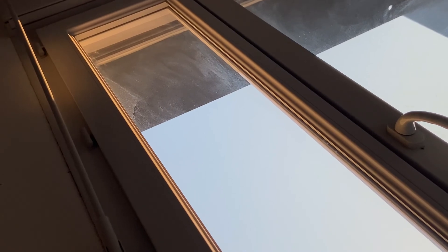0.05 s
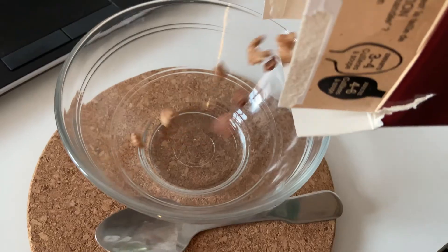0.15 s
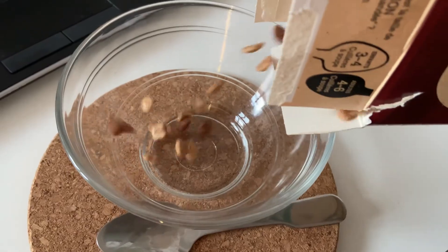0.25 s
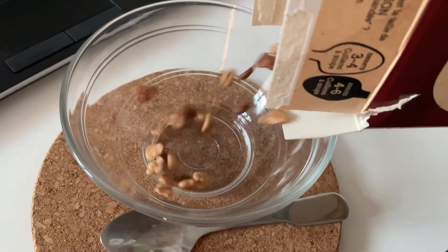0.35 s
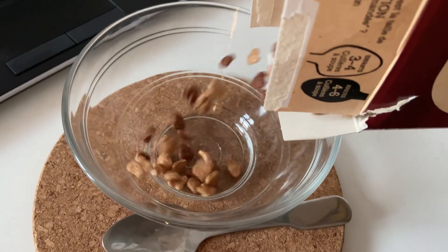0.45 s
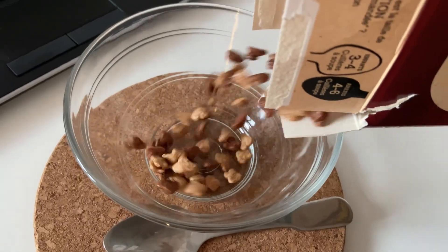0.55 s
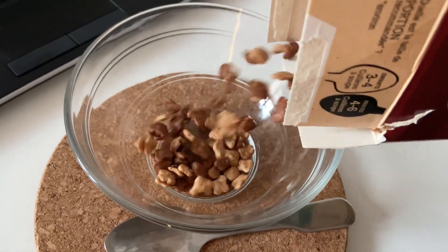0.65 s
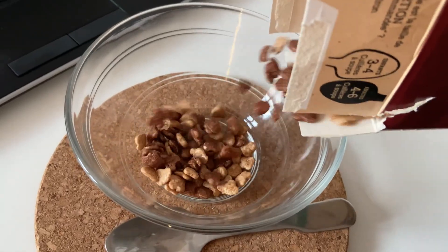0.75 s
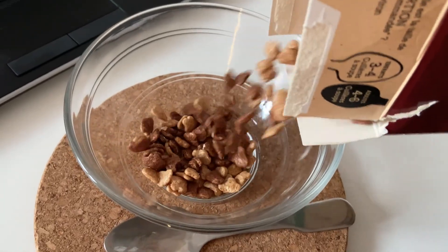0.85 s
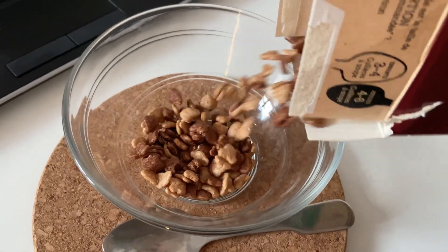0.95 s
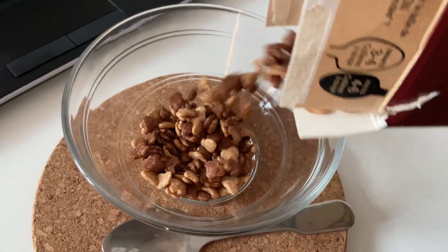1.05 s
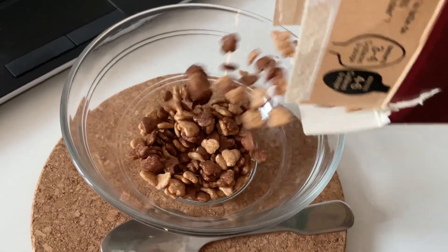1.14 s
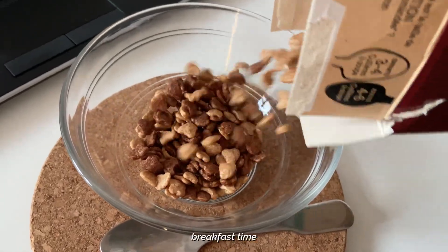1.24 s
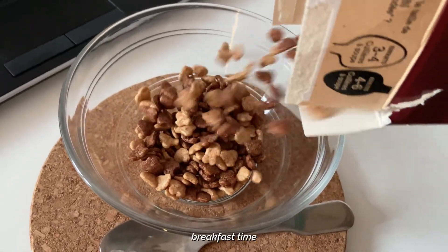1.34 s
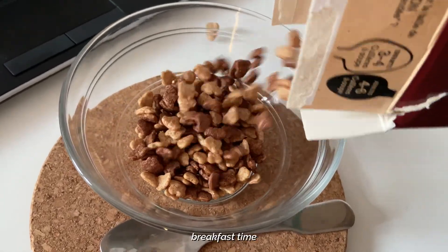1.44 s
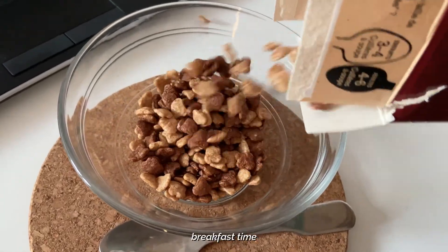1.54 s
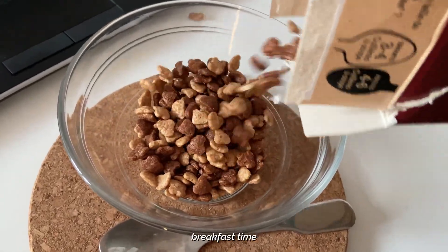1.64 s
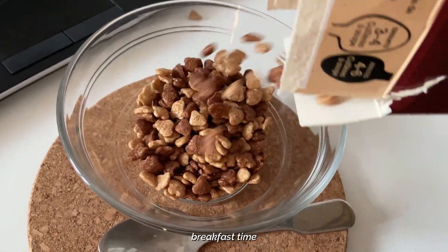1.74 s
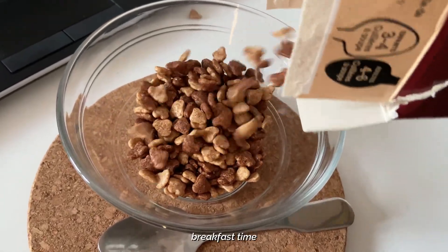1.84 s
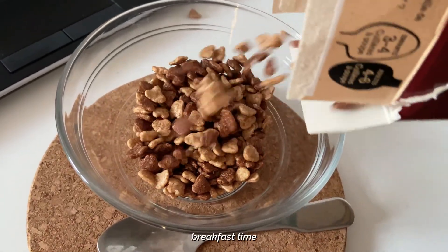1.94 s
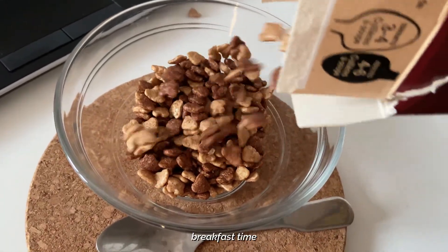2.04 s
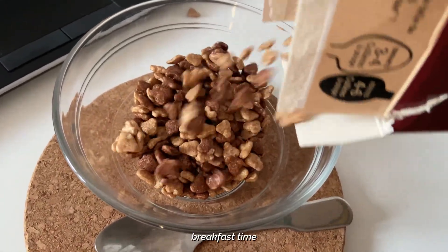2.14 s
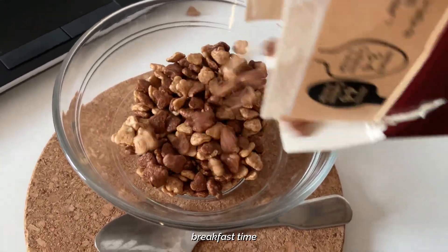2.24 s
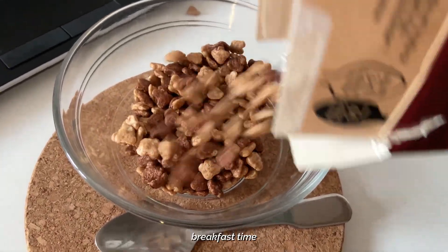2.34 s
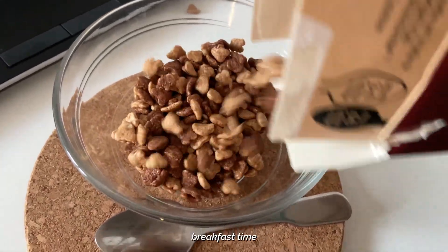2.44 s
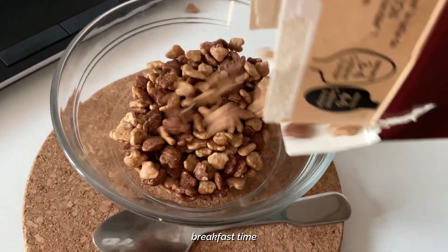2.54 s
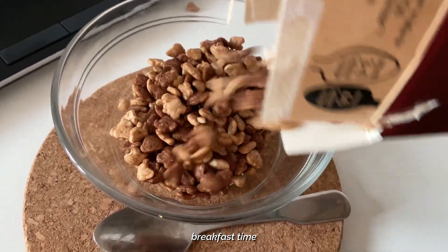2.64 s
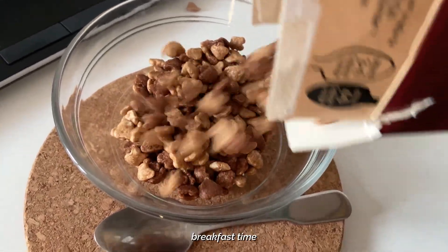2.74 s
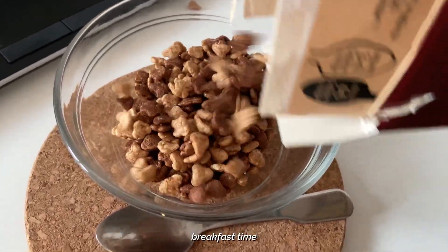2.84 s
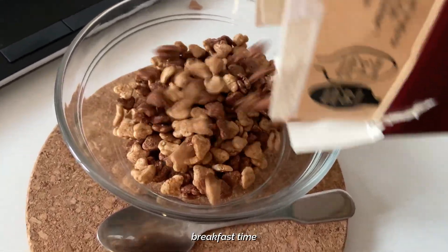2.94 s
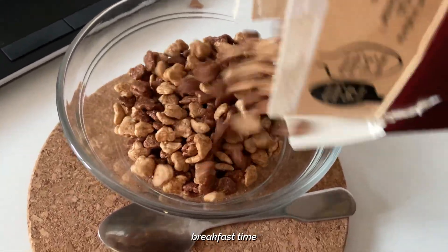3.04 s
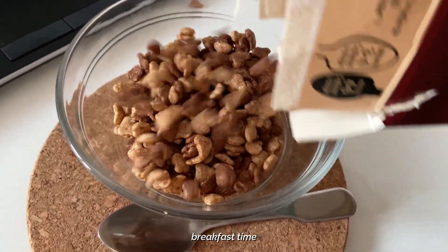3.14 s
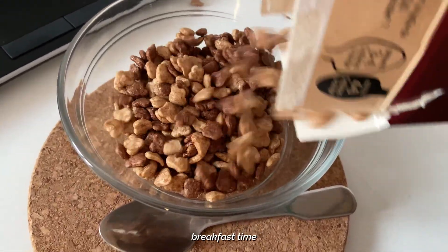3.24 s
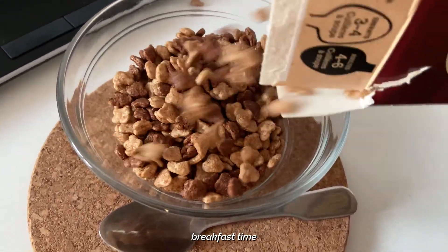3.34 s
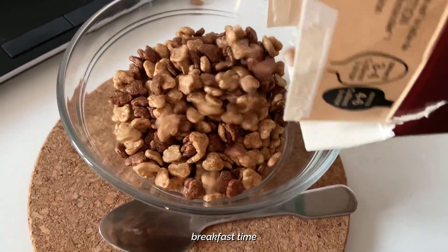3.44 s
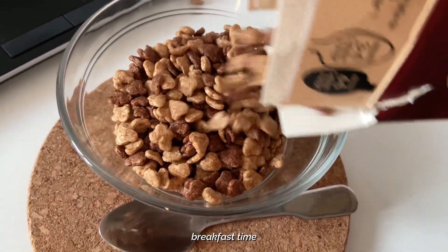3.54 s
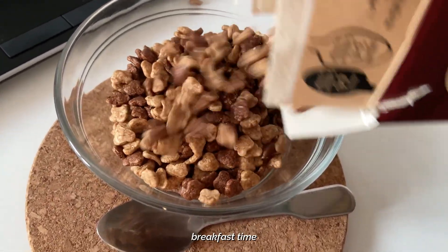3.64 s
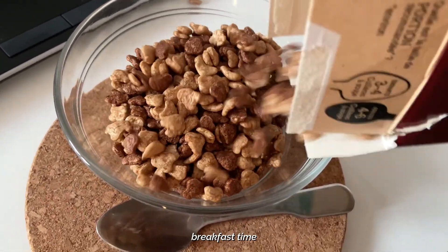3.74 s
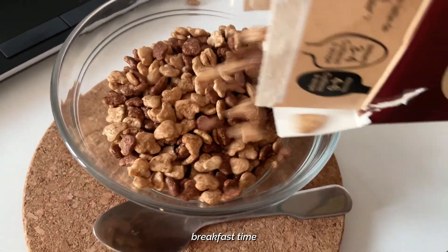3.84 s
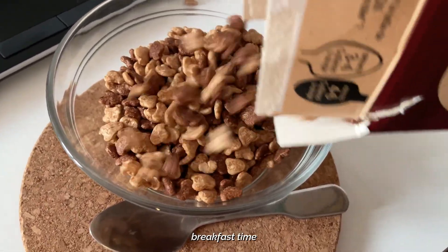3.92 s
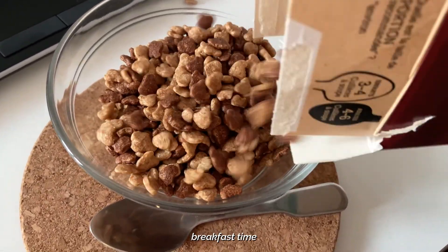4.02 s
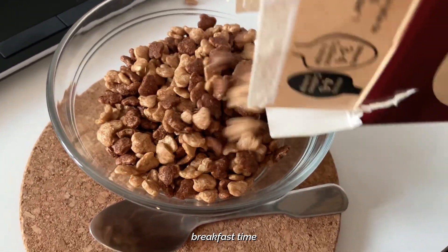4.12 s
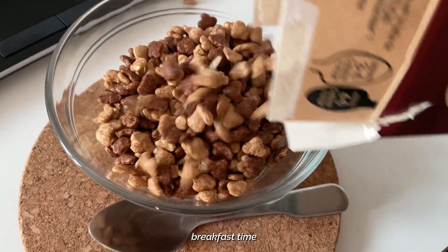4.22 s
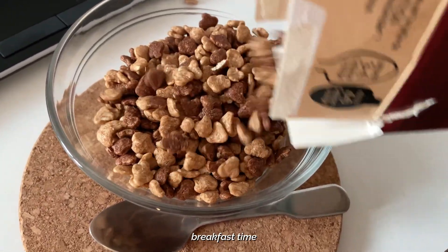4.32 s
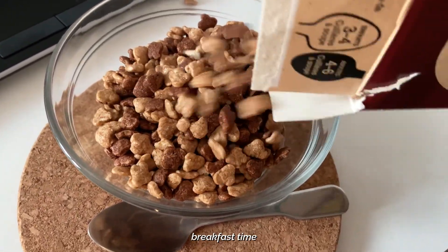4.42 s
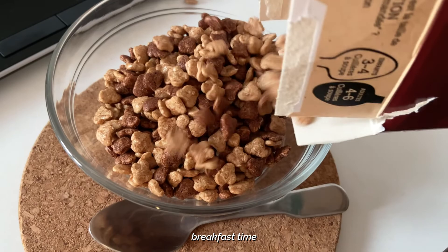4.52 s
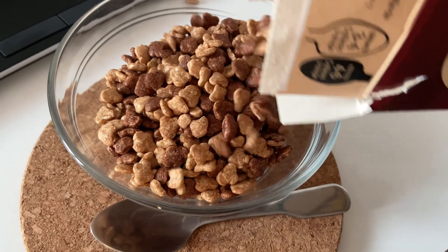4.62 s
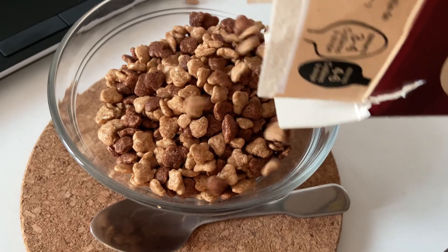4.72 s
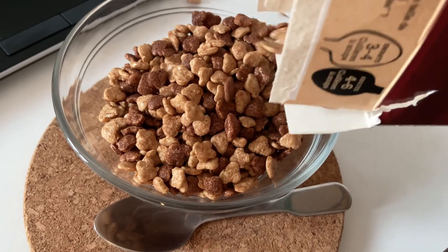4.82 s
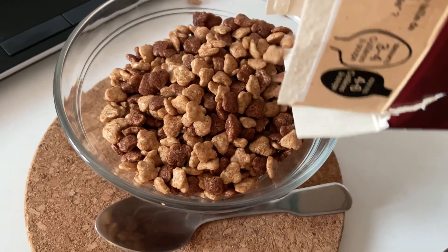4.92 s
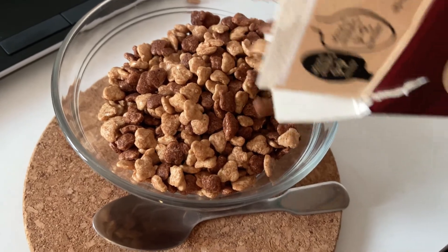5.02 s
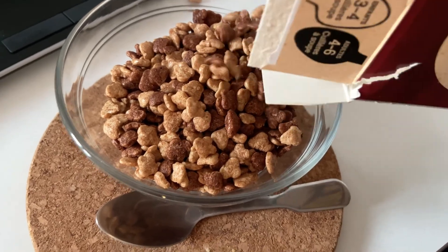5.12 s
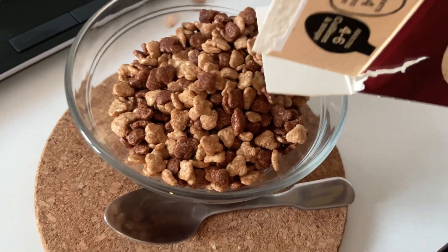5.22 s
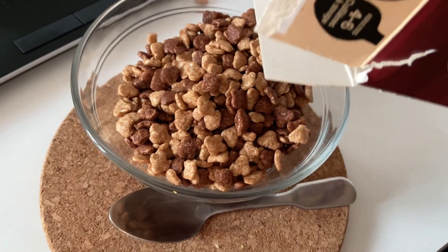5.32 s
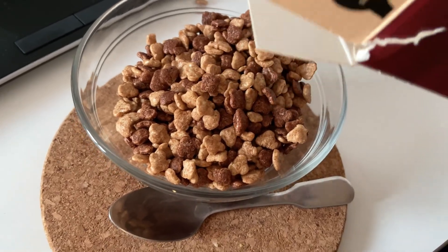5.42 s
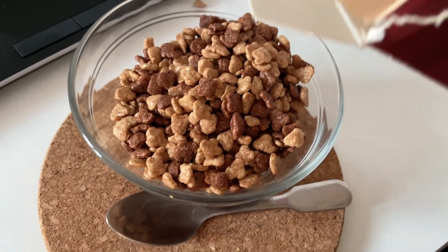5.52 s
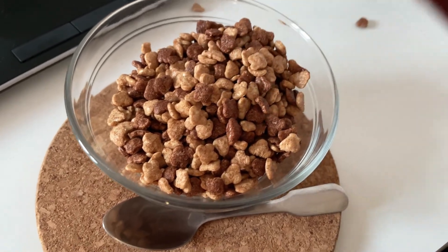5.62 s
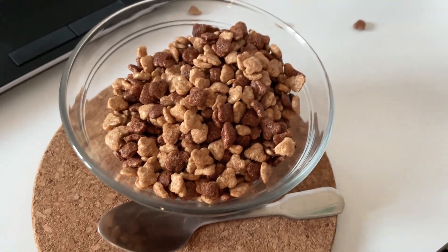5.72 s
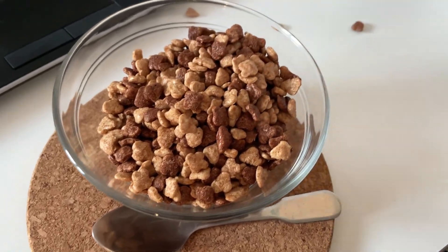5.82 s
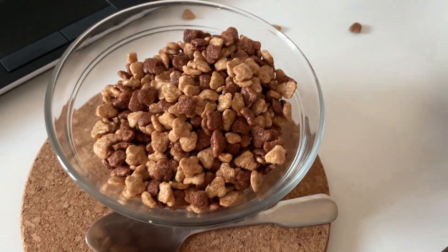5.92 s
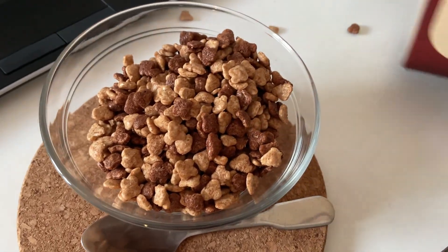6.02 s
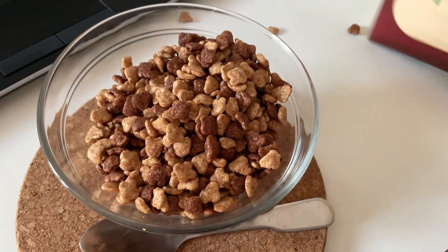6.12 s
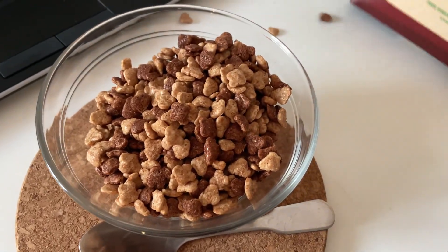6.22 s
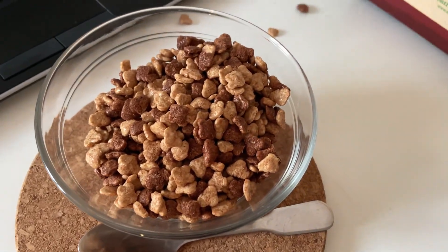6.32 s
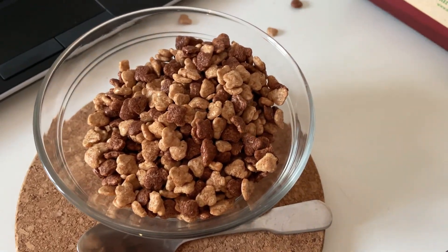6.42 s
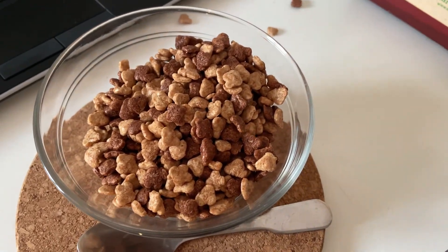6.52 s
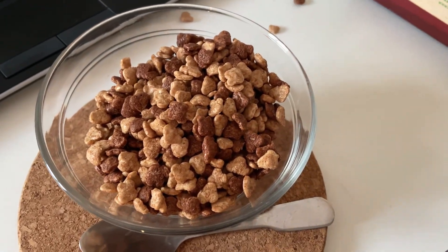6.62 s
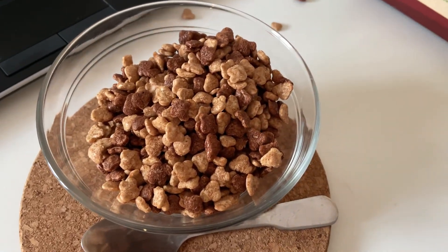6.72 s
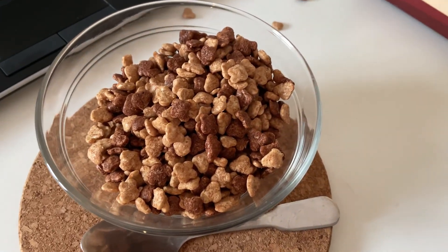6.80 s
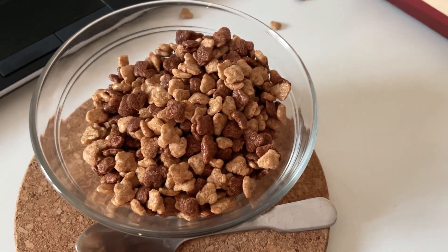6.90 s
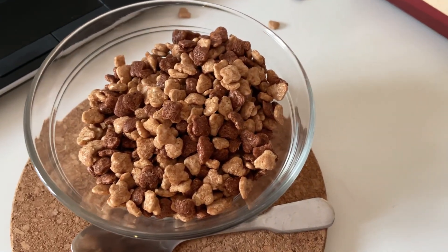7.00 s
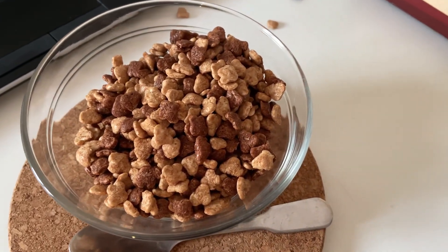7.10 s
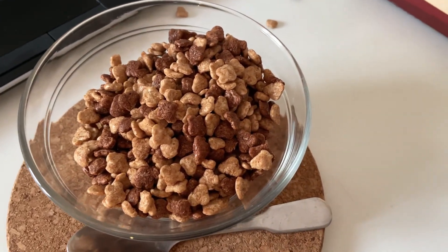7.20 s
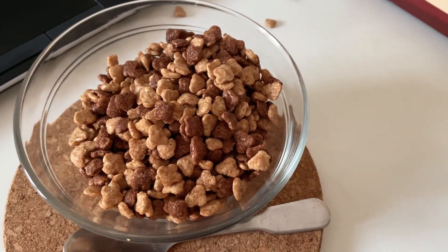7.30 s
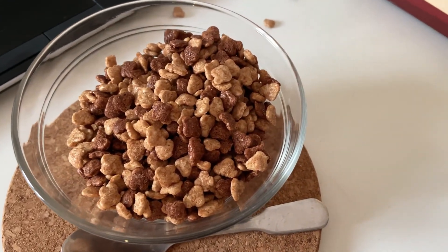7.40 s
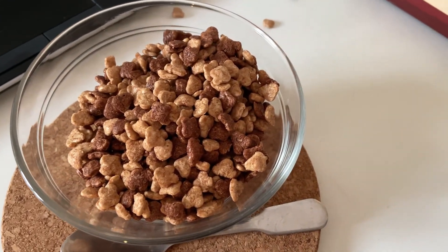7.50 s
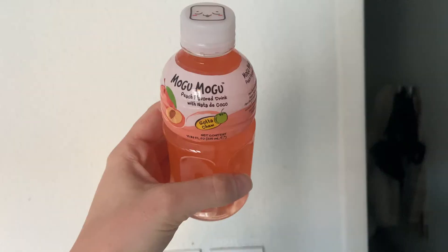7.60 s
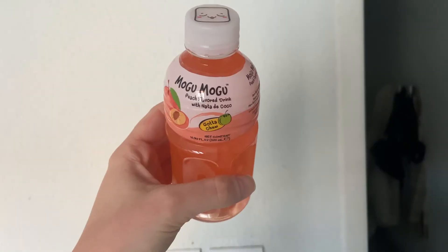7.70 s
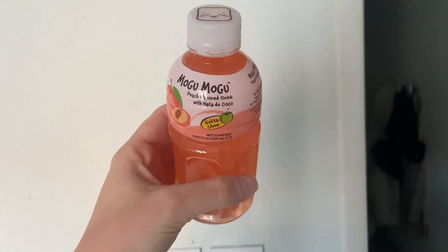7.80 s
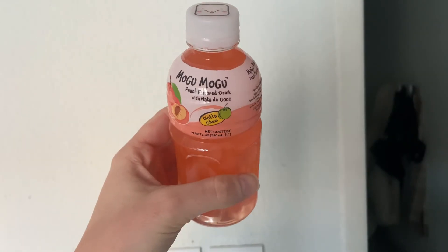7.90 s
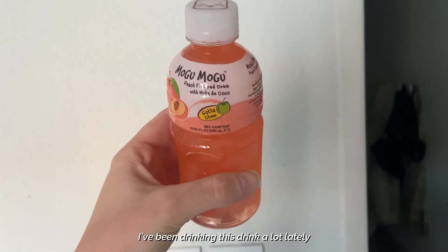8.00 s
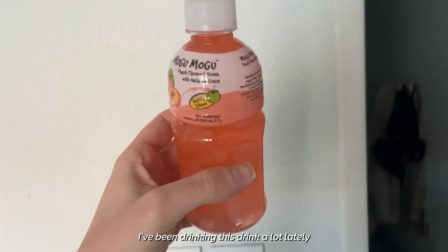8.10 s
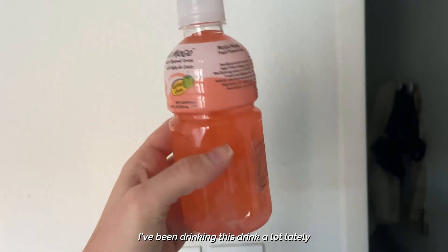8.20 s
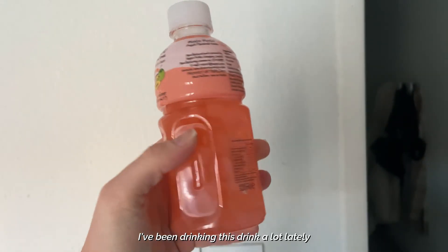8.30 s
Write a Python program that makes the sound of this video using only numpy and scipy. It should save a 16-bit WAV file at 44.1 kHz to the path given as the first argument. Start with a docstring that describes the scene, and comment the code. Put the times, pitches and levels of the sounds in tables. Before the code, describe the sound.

Crisp cereal pieces slide and clatter along cardboard in quick shaken surges, ticking onto a growing heap. High glass pings stand out at the start and fade as the bowl fills. After about five seconds the pour stops; a brief bag crinkle and dull tumbling lead to one strong cardboard thump on the counter. Close microphones, small room with a short tail, then quiet air.

```python
"""On a kitchen counter, dry cereal is shaken from a cardboard box into a glass bowl, close to a pair of microphones.
Each shake slides pieces along the box: random contacts through the colour of cardboard, with short pitched knocks.
They tick on the heap and ring the glass, modelled as decaying modes, until the heap shields it.
The box is tipped upright, its contents tumble back as filtered clatter, and it is set down with a knock
of box modes; counter and room ring on, over quiet room air."""
import sys
import numpy as np
from scipy import signal
from scipy.fft import rfft, irfft, next_fast_len
from scipy.io import wavfile
from scipy.ndimage import uniform_filter1d

SR = 44100
rng = np.random.default_rng(int(sys.argv[2]) if len(sys.argv) > 2 else 0)


def generate_wav(sig):
    """Save sig (samples, or channels by samples) to the path in sys.argv[1] as 16-bit PCM at SR."""
    pcm = np.round(np.clip(np.atleast_2d(sig).T, -1, 1) * 32767).astype(np.int16)
    wavfile.write(sys.argv[1], SR, pcm)


N = 368279
TIME = np.arange(N) / SR
LEFT_RIGHT = np.array([[1], [-1]])   # opposite signs for the two ears

# stream that keeps running between shakes: time_s, sliding_db in the box, landing_db on the heap
STREAM = [(0.103, -38, -57), (0.28, -32, -38), (0.72, -33, -35), (1.55, -38, -45.5), (2.9, -37, -43),
          (4.45, -39.5, -45), (5.08, -44, -62), (5.2, -57.5, -56), (5.31, -62, -63), (5.4, -68, -77)]
# colour of pieces sliding along the box: freq_hz, gain_db
SLIDE = [(200, -16), (450, -7), (630, -6.5), (730, -7), (860, 5), (1100, 3.5), (1330, -7), (1600, -2.5),
         (2200, 0.4), (2900, -2), (4000, -8), (5000, -7.5), (6200, -9.5), (9000, -12), (16000, -28)]
# colour of pieces ticking on the heap: freq_hz, gain_db
LANDING = [(400, -29.5), (1500, -3.5), (4000, -12), (6300, -6.5), (9500, 0), (12500, 4.5), (15500, -1)]
# colour of the drumming cardboard: freq_hz, gain_db
CARDBOARD = [(25, -32.5), (50, -8.5), (90, 1), (200, 1), (350, 1), (520, -0.5), (900, -14.5), (3000, -50.5)]
# colour of a hard crack of the box: freq_hz, gain_db
CRACK = [(300, -13), (900, -9), (2400, 7), (3800, -8.5), (5300, -4), (8000, -26), (16000, -44.5)]
# scatter off box and bowl that differs between the ears: freq_hz, gain_db
SCATTER = [(60, -28), (250, -17), (600, -8), (1000, -9), (1700, -12), (2800, -5.5), (5000, -8), (7000, -16),
           (16000, -14)]


def from_db(db):
    """Decibels to gain."""
    return 10 ** (np.asarray(db) / 20)


def rms_one(x):
    """Scale to unit power."""
    return x / np.sqrt(np.mean(x ** 2) + 1e-20)


def gains(rows):
    """One gain curve per dB column, closing within a few ms outside the rows."""
    times, *columns_db = np.transpose(rows)
    gate_times = [times[0] - .003, times[0], times[-1], times[-1] + .01]
    gate = np.interp(TIME, gate_times, [0, 1, 1, 0])
    return [gate * from_db(np.interp(TIME, times, db)) for db in columns_db]


def at_hz(points, hz):
    """Read a table on a log-frequency axis."""
    freq_hz, value = np.transpose(points)
    return np.interp(np.log(hz + 1), np.log(freq_hz), value)


def convolve(x, response):
    """Pass each channel through an impulse response."""
    per_channel = response.reshape((1,) * (x.ndim - 1) + (-1,))
    return signal.oaconvolve(x, per_channel, axes=-1)[..., :N]


def colour(x, spectrum, size=8192):
    """Causal (minimum-phase) filter with the given dB curve."""
    curve_db = at_hz(spectrum, np.fft.rfftfreq(size, 1 / SR))
    cepstrum = irfft(np.log(from_db(curve_db)))
    # folding the cepstrum forward in time makes the phase minimal
    cepstrum[1:size // 2] *= 2
    cepstrum[size // 2 + 1:] = 0
    return convolve(x, irfft(np.exp(rfft(cepstrum))))


def ring(clicks, hz, t60):
    """Two-pole resonator: a unit click starts a sine of about height 1 that falls 60 dB in t60 seconds."""
    decay = from_db(-60 / (t60 * SR))
    angle = 2 * np.pi * hz / SR
    # the tiny offset keeps the filter clear of very slow, tiny numbers
    return signal.lfilter([0, np.sin(angle)], [1, -2 * decay * np.cos(angle), decay * decay], clicks + 1e-18)


def burst(t60, size=1024):
    """A dying puff of noise with unit energy."""
    puff = rng.standard_normal(size) * from_db(-60 * TIME[:size] / t60)
    return puff / np.linalg.norm(puff)


def struck(start, attack_s, db_per_s):
    """A gain that rises to 1 at the start time, then dies at a steady rate."""
    age = TIME - start
    return np.clip(1 + age / attack_s, 0, 1) * from_db(-db_per_s * np.maximum(age, 0))


def clicks_at(times, db):
    """Single clicks of given strengths."""
    return np.bincount(np.round(np.asarray(times) * SR).astype(int), from_db(db), N)


def collisions(per_s, spread_db, clump_db):
    """Random contacts in loose clumps, of exponentially spread strength, at an even mean power."""
    clumps = rms_one(uniform_filter1d(rng.standard_normal(N), size=500))
    sizes_db = spread_db * np.minimum(rng.exponential(1, N), 4) + clump_db * clumps
    happens = rng.random(N) < per_s / SR
    clicks = from_db(sizes_db) * rng.choice([-1, 1], N) * happens
    local_power = np.abs(uniform_filter1d(clicks ** 2, size=2600))
    return clicks / np.sqrt(local_power + 1e-6)


def crunch(clicks, t60, count=32):
    """Contacts are dealt to unlike pieces, each with its own brittle ring and its own path to the two ears."""
    at = np.flatnonzero(clicks)
    piece = rng.integers(0, count, N)[at]
    shapes = np.array([[burst(t60, size=300) for _ in range(count)] for _ in range(2)])
    where = (at[:, None] + np.arange(shapes.shape[-1])).ravel()
    mid, side = [np.bincount(where, (clicks[at, None] * s[piece]).ravel(), N)[:N] for s in shapes]
    return mid + colour(side, SCATTER) * LEFT_RIGHT


def rattle(spectrum, per_s, spread_db, clump_db, t60):
    """Many pieces colliding, heard through the body they touch; unit power."""
    contacts = collisions(per_s, spread_db, clump_db)
    return rms_one(colour(crunch(contacts, t60), spectrum))


def pieces(per_s, cycles, low_hz, high_hz, spread_db, clump_db, count=40):
    """Pieces knock together at random, each with a short pitch of its own; unit power."""
    knocks = collisions(per_s, spread_db, clump_db)
    piece = rng.integers(0, count, N)
    pitches = np.geomspace(low_hz, high_hz, count)
    return rms_one(sum(ring(knocks * (piece == k), hz, cycles / hz) for k, hz in enumerate(pitches)))


def piece_knocks(times, levels_db, pitches, size=4096):
    """Each blow rings the few short modes of one piece."""
    # modes of one piece: pitch_ratio (multiple of its pitch), level_db
    piece_modes = [(.58, -8.5), (1, 0.5), (1.47, -8.5)]
    cycles = 25   # cycles of the piece's pitch in which it falls 60 dB
    age = TIME[:size]
    out = np.zeros(N)
    for start, db, hz in zip(times, levels_db, pitches):
        dying = from_db(db - 60 * age * hz / cycles)
        tone = sum(from_db(mode_db) * np.sin(2 * np.pi * hz * ratio * age) for ratio, mode_db in piece_modes)
        first = round(start * SR)
        out[first:first + size] += dying * tone
    return out


def flow():
    """Gains of sliding and landing: the running stream plus one smooth surge per shake, added in power."""
    # shakes of the box, each throwing out a surge: peak_s, length_s, sliding_db, landing_db
    shakes = [(0.534, 0.17, -33, -35), (0.67, 0.16, -35, -35.5), (1.023, 0.28, -33.5, -40.5),
              (1.248, 0.2, -29.5, -36), (1.43, 0.24, -30.5, -34), (1.642, 0.26, -31.5, -39.5),
              (1.844, 0.26, -34.5, -39), (2.016, 0.22, -32, -38.5), (2.209, 0.18, -31, -37.5),
              (2.425, 0.19, -29, -37.5), (2.623, 0.23, -30, -41), (2.822, 0.17, -30, -37.5),
              (3.02, 0.18, -27.5, -39), (3.225, 0.23, -27.5, -36), (3.491, 0.25, -28.5, -44.5),
              (3.761, 0.28, -29.5, -45), (4.035, 0.37, -31, -45), (4.311, 0.25, -28.5, -50),
              (4.549, 0.23, -30.5, -43.5), (4.815, 0.21, -36, -53), (4.96, 0.35, -40.5, -73)]
    surge_shape = 1.6   # power of the parabolic hump
    power = np.square(gains(STREAM))
    for peak, length, *levels_db in shakes:
        hump = np.maximum(1 - (2 * (TIME - peak) / length) ** 2, 0) ** surge_shape
        power += np.outer(from_db(levels_db), hump) ** 2
    return np.sqrt(power)


def pour(sliding, landing):
    """Pieces scrape along the drumming cardboard, then tick onto the heap; a thin stream breaks into single ticks."""
    # clumps that break loose, slap the wall and scatter: start_s, slap_db, scatter_db on the heap
    loose_clumps = [(0.212, -25.5, -38), (0.2767, -31, -36), (0.414, -27, -40.5), (0.6892, -32, -33),
                    (1.0359, -30.5, -48), (1.199, -25.5, -38), (1.227, -25.5, -41.5), (1.62, -24.5, -47),
                    (1.684, -29, -45), (1.8235, -21, -42), (2.415, -31, -28.5), (2.5834, -32.5, -40),
                    (2.829, -26.5, -45), (3.0329, -32, -39), (3.055, -25, -39), (3.4345, -32.5, -38),
                    (3.736, -22.5, -44.5), (4.0082, -36, -35)]
    # clumps that drum on the box wall: start_s, relative_level_db, pitch_hz
    drum_hits = [(1.842, -30, 405), (2.099, -24, 257), (2.329, -25.5, 208), (2.908, -23.5, 250),
                 (3.107, -25.5, 225), (3.219, -27, 336), (3.325, -27, 256), (4.433, -24, 260)]
    box_flow = np.sqrt(sliding / sliding.max())
    heap_flow = landing / landing.max()
    slaps, scatters = sum(np.outer(from_db(db), struck(start, attack_s=0.0071, db_per_s=519.5))
                          for start, *db in loose_clumps)

    scrape = rattle(SLIDE, per_s=1500 * box_flow, spread_db=1.0, clump_db=0.9, t60=0.011)
    large = pieces(per_s=180, cycles=29, low_hz=1270, high_hz=4570, spread_db=2.0, clump_db=-5.0)
    chips = pieces(per_s=650, cycles=12, low_hz=960, high_hz=5630, spread_db=2.0, clump_db=1.0)
    clatter = from_db(-1) * scrape + from_db(-8.5) * large + from_db(-5.5) * chips
    in_box = from_db(-3.0) * np.hypot(sliding, slaps) * clatter

    ticks = rattle(LANDING, per_s=60 + 1800 * heap_flow, spread_db=3.8, clump_db=0.6, t60=.002)
    on_heap = from_db(6.5) * np.hypot(landing, scatters) * ticks

    drumming = rattle(CARDBOARD, per_s=500, spread_db=3.0, clump_db=-1.5, t60=0.0098)
    cardboard = wall_rumble(sliding) * drumming
    drums = sum(ring(clicks_at([start], [db - 4.5]), hz, t60=0.053) for start, db, hz in drum_hits)
    return in_box + on_heap + cardboard + drums


def wall_rumble(sliding):
    """The cardboard is shaken by the first tilt, then follows the flow along it, less so as the box empties."""
    lighter_db = -3 * np.maximum(TIME - 3.5, 0)   # loses 3 dB per s after 3.5 s
    flow_share = 0.44   # share of the flow's swing in dB
    carried = from_db(-43.5 + lighter_db) * (sliding / sliding.max()) ** flow_share
    tilt = from_db(-37.5) * struck(STREAM[0][0], attack_s=0.0026, db_per_s=27.5)
    return np.hypot(carried, tilt)


def bowl(landing):
    """Hard hits and a patter of light ones ring the glass; the growing heap shields it from the patter."""
    # pieces that hit bare glass: start_s, relative_level_db, spot_hz (pitch the struck spot favours)
    pings = [(0.1423, -12, 10050), (0.177, -27, 5670), (0.1874, -22, 12000), (0.205, -21.5, 12000),
             (0.254, -18, 12000), (0.2682, -14, 10050), (0.31, -25.5, 5670), (0.4187, -15, 11000),
             (0.475, -15, 10050), (0.5043, -23, 13600), (0.5188, -15, 12500), (0.652, -16, 12500),
             (0.674, -18.5, 10050), (0.7404, -12.5, 12500), (0.907, -18.5, 12000), (0.9814, -25.5, 5670),
             (1.061, -23, 12000), (1.204, -21, 5670), (1.3712, -31, 5670), (1.391, -25, 5670),
             (1.438, -30.5, 5670), (1.596, -25.5, 5670), (1.8347, -24, 12000), (3.236, -25, 5670),
             (3.7526, -29, 5670), (5.2297, -50, 5670), (5.252, -36, 5670), (5.2753, -33.5, 5670),
             (5.299, -44, 5670)]
    # modes of the bowl: freq_hz, level_db, t60_s, shield_db_per_s (patter lost as the heap grows)
    bowl_modes = [(3736, -15, .1, 1), (5670, -2.5, .075, 1.1), (10047, -.5, .075, 6), (11966, 1, .07, 4),
                  (12316, -3, .07, 4), (12504, -6, .07, 4), (14114, -11, .05, 3), (15489, -6.5, .06, 3.3)]
    spot_width_oct, off_spot_db = 0.23, -15.5   # modes this far from the favoured pitch ring this much less
    patter_tilt = 1.4   # light hits excite a mode by this power of its pitch
    twin_split = 0.0016   # the bowl is not quite round: each mode is a pair this share of its pitch apart
    times, strength_db, spot_hz = np.transpose(pings)
    patter = from_db(-14.5) * landing * collisions(per_s=70.5, spread_db=-0.5, clump_db=-1.0)
    out = np.zeros(N)
    for hz, level_db, t60, shield_db_per_s in bowl_modes:
        widths_away = np.log2(hz / spot_hz) / spot_width_oct
        off_spot = np.log2(1 + widths_away ** 2) ** .5
        hits = clicks_at(times, strength_db + level_db + off_spot_db * off_spot + 1.5)
        # small, hard pieces favour the high modes
        bright_patter = patter * (hz / 12000) ** patter_tilt * rng.standard_normal(N)
        light = bright_patter * from_db(level_db - shield_db_per_s * TIME)
        # where a piece lands decides how the pair shares the blow
        share = rng.uniform(.2, .8, N)
        out += ring((hits + light) * share, hz * (1 - twin_split / 2), t60)
        out += ring((hits + light) * (1 - share), hz * (1 + twin_split / 2), t60)
    return out


def clacks():
    """Single hard contacts: the piece's ring, a crumbly body and a brittle edge."""
    # pieces that clack on heap, box or counter: start_s, ring_db, relative edge_db, pitch_hz
    clack_hits = [(0.1213, -22, -40, 2200), (0.129, -18.5, -36, 3000), (0.212, -17.5, -27, 2220),
                  (1.333, -24, -29, 4930), (1.6314, -20, -36, 1540), (1.825, -26, -36, 2310),
                  (1.872, -22, -34, 5500), (2.623, -21, -27, 1800), (2.794, -25.5, -30, 1500),
                  (2.929, -25.5, -36, 1870), (3.0563, -15, -38, 4330), (3.301, -22.5, -38, 1170),
                  (3.735, -22.5, -40, 1740), (4.233, -26.5, -25, 2100), (4.799, -27.5, -38, 1060),
                  (4.8685, -19.5, -40, 3100), (4.957, -25, -38, 2950), (5.0118, -25, -34, 1900),
                  (5.023, -30, -30, 1680), (5.1449, -40, -28, 1920), (5.23, -49, -37, 1300),
                  (5.2505, -46, -39, 2150), (5.275, -47, -43, 2170), (5.3, -48, -37, 2200)]
    times, ring_db, edge_db, pitches = np.transpose(clack_hits)
    body = from_db(19.5) * colour(crunch(clicks_at(times, ring_db), t60=.009), SLIDE)
    edge = colour(crunch(clicks_at(times, edge_db + 21), t60=.004), LANDING)
    return piece_knocks(times, ring_db, pitches) + body + edge


def tip_back():
    """The cereal slides back inside the box, muffled, and thuds onto the bottom."""
    # the box tipped upright: time_s, relative sliding_db, relative thudding_db
    tip_levels = [(5.3, -60.5, -80), (5.47, -66.5, -64), (5.53, -53, -68), (5.63, -48, -64),
                  (5.73, -43, -64), (5.804, -45.5, -49.5), (5.95, -46, -46), (6.104, -44.5, -41.5),
                  (6.178, -31.5, -31.5), (6.296, -33, -29), (6.346, -36, -32), (6.56, -40.5, -38.5)]
    # colour of the muffled slide: freq_hz, gain_db
    slide_back = [(150, -5.5), (450, -6), (650, -12), (750, -11), (900, -1), (1100, -3.5), (1500, -4.5),
                  (2000, -5.5), (2700, -6), (4000, -11.5), (6000, -18), (10000, -23), (16000, -30.5)]
    # colour of thuds on the box bottom: freq_hz, gain_db
    thud_colour = [(25, -42), (55, -13), (110, -2.5), (200, -3.5), (330, 0.5), (520, -2.5), (900, -4),
                   (3000, -37.5)]
    sliding, thudding = gains(tip_levels)
    slide = rattle(slide_back, per_s=2200, spread_db=2.0, clump_db=1.5, t60=0.006)
    thud = rattle(thud_colour, per_s=490, spread_db=0.5, clump_db=-1.0, t60=0.0067)
    return from_db(-1.0) * sliding * slide + from_db(0.5) * thudding * thud


def drops():
    """Clumps knock onto the bottom of the box; the cardboard muffles their crack."""
    # clumps dropping in the box: start_s, relative crack_db, relative thud_db, ring_db, pitch_hz
    drop_hits = [(6.154, -28.5, -22.5, -27.5, 700), (6.1945, -23, -35, -20.5, 1460),
                 (6.229, -24.5, -25.5, -19.5, 1380), (6.276, -31, -26, -24, 960),
                 (6.294, -31, -16.5, -27, 620), (6.33, -26, -27.5, -27, 1500),
                 (6.442, -24.5, -29, -27, 700), (6.518, -27, -36.5, -25, 2500)]
    times, crack_db, thud_db, ring_db, pitches = np.transpose(drop_hits)
    crack = colour(crunch(clicks_at(times, crack_db + 17), t60=.006), CRACK)
    thud = colour(crunch(clicks_at(times, thud_db + 28), t60=.004), CARDBOARD)
    return crack + thud + piece_knocks(times, ring_db, pitches)


def bag():
    """The inner bag folds in a few short bursts of snaps as the box is righted."""
    # crumples of the bag: start_s, level_db
    crumples = [(5.7, -44), (5.739, -47), (5.7516, -37.5), (5.756, -44), (5.777, -45), (5.786, -44)]
    # colour of the bag: freq_hz, gain_db
    bag_colour = [(500, -22), (1100, 2.5), (2200, -3), (3000, 6), (3700, -18), (4300, 2), (5000, -1.5),
                  (6000, -8), (9500, -9), (16000, -28)]
    folding = sum(from_db(db) * struck(start, attack_s=0.0023, db_per_s=600) for start, db in crumples)
    return folding * rattle(bag_colour, per_s=1200, spread_db=6.0, clump_db=-2.5, t60=0.007)


def set_down():
    """Each contact with the counter rings the box; around the first, its contents rustle, then settle."""
    # the box meets the counter and rebounds: start_s, relative thump_db, relative crack_db
    knocks = [(6.5725, -18.5, -31.5), (6.5781, -10.5, -15.5), (6.5813, -4, -28.5), (6.584, -19, -17.5),
              (6.5868, -9.5, -31.5), (6.6146, -18, -46.5)]
    # modes of the full box on the counter: freq_hz, level_db, t60_s
    box_modes = [(53.9, -26.5, 0.42), (186.4, -15.5, 0.045), (336, 2.5, 0.008), (401, -7, 0.035),
                 (475, -21.5, 0.034), (641, -10, 0.011), (898, -6.5, 0.015)]
    times, thump_db, crack_db = np.transpose(knocks)
    blows = clicks_at(times, thump_db)
    thump = sum(from_db(db) * ring(blows, hz, t60) for hz, db, t60 in box_modes)
    # the thump carries little deep bass below about 55 Hz
    thump = signal.sosfilt(signal.butter(2, 55, "high", fs=SR, output="sos"), thump)
    # soft cardboard contact dulls the thump
    thump = signal.sosfilt(signal.butter(1, 1007, fs=SR, output="sos"), thump)
    crack = from_db(18) * colour(crunch(clicks_at(times, crack_db), t60=.007), CRACK)
    settling = from_db(-53.5) * struck(times[0], attack_s=.03, db_per_s=90)
    contents = rattle(LANDING, per_s=2000, spread_db=3.0, clump_db=1.0, t60=.004)
    return thump + crack + settling * contents


def boom():
    """The landing rings on in counter and room: a few low resonances over a dull wash."""
    # low resonances of counter and room: freq_hz, level_db, t60_s
    counter_modes = [(177, -33.5, 0.36), (280, -32, 0.56), (382, -27.5, .38), (465, -32, 0.44)]
    # colour of the diffuse wash: freq_hz, gain_db
    boom_colour = [(40, -14), (100, -7.5), (185, -1), (280, -3.5), (385, 1.5), (470, -7), (650, -8.5),
                   (1000, -12.5), (1500, -23.5), (2500, -23.5), (5000, -33), (16000, -52.5)]
    start_s, level_db = 6.585, -24.5
    common, own = rng.standard_normal((2, N))
    wide = common + from_db(5.0) * colour(own, SCATTER) * LEFT_RIGHT
    wash = rms_one(colour(wide, boom_colour))
    hum = sum(ring(clicks_at([start_s], [db]), hz, t60) for hz, db, t60 in counter_modes)
    return hum + wash * from_db(level_db) * struck(start_s, attack_s=0.011, db_per_s=128)


def rocking():
    """The box rocks to rest: each soft touch of its edge sounds two low cardboard modes."""
    # touches of the edge: start_s, level_db, pitch_hz
    rocks = [(6.733, -37, 385), (6.79, -44, 385), (6.826, -51, 350), (6.894, -52.5, 339)]
    low_ratio, low_db = .46, -6   # the lower mode, relative to the upper
    out = np.zeros(N)
    for start, db, hz in rocks:
        phase = 2 * np.pi * hz * (TIME - start)
        tone = np.sin(phase) + from_db(low_db) * np.sin(low_ratio * phase)
        out += from_db(db) * struck(start, attack_s=0.016, db_per_s=380) * tone
    return out


def taps():
    """Two faint, dull contacts on the counter after the box is down."""
    # the taps: start_s, relative_level_db
    tap_hits = [(7.4748, -32), (7.533, -40)]
    # colour of a tap: freq_hz, gain_db
    tap_colour = [(150, -5), (700, 2), (1500, 1), (2600, -3), (4000, -15), (8000, -22), (16000, -38)]
    times, db = np.transpose(tap_hits)
    return colour(crunch(clicks_at(times, db), t60=0.015), tap_colour)


def kitchen(x, room_t60):
    """The room adds a short tail, alike at both ears in the bass and wide above it."""
    # colour of the kitchen's tail: freq_hz, gain_db
    tail_colour = [(60, -18), (200, -6), (400, 1.5), (900, -9), (3000, -9.5), (5700, -6.5), (9000, -8.5),
                   (16000, -4.5)]
    mid, side = [colour(convolve(x.mean(axis=0), burst(room_t60, size=32768)), tail_colour) for _ in range(2)]
    return mid + from_db(6.5) * colour(side, SCATTER) * LEFT_RIGHT


def background():
    """Quiet room air, alike in both ears in the bass, and a few soft low bumps."""
    # colour of the room air: freq_hz, gain_db
    air_colour = [(20, -21.5), (50, 3), (90, -7), (200, -12), (400, -23), (900, -34.5), (2000, -29),
                  (3000, -40), (4100, -34), (6000, -41), (16000, -48)]
    # soft low bumps: start_s, level_db
    bump_hits = [(0.039, -45.5), (5.45, -55.5), (7.53, -57.5)]
    # colour of a bump: freq_hz, gain_db
    bump_colour = [(15, -20.5), (35, -7), (55, 4.5), (90, -16), (250, -26.5), (1000, -60.5)]
    common, own = rng.standard_normal((2, N))
    air = colour(common + from_db(12.5) * colour(own, SCATTER) * LEFT_RIGHT, air_colour)
    bumps = sum(from_db(db) * struck(start, attack_s=0.036, db_per_s=83.5) for start, db in bump_hits)
    bump_noise = rms_one(colour(rng.standard_normal(N), bump_colour))
    return from_db(-68.5) * rms_one(air) + bumps * bump_noise


def scene():
    """Everything on the counter sounds into the same kitchen."""
    sliding, landing = flow()
    counter = pour(sliding, landing) + bowl(landing) + clacks() + tip_back() + drops() + bag() + taps()
    knock = set_down() * from_db(0.5 * LEFT_RIGHT / 2)   # left 0.5 dB above right
    room = kitchen(counter + from_db(-3.5) * knock, room_t60=0.17)
    return counter + knock + boom() + rocking() + room + background()


def record(dry):
    """The left port is nearer, so its phase leads, ever more in the upper treble; deep bass and top are cut."""
    # phase of the microphone pair: freq_hz, lead_rad (left ahead of right)
    port_phase = [(300, 0), (600, .8), (800, 2.3), (1100, 1.3), (1600, .1), (2300, .2), (2800, 1.0),
                  (4900, .4), (5700, 1.06), (7200, 3.14), (10300, 6.28), (13550, 9.42), (16000, 12)]
    # balance of the microphone pair: freq_hz, balance_db (left minus right)
    port_balance = [(100, 0), (300, .5), (550, -1.5), (1000, -1.5), (1600, -.5), (2900, -3.5), (4900, -1.5),
                    (6000, 0), (16000, 0)]
    size = next_fast_len(N + 4096)
    hz = np.fft.rfftfreq(size, 1 / SR)
    lead = np.interp(hz, *np.transpose(port_phase))
    half = LEFT_RIGHT / 2   # each side takes half the difference
    ports = from_db(half * at_hz(port_balance, hz)) * np.exp(1j * half * lead)
    heard = irfft(rfft(dry, size) * ports, size)[:, :N]
    heard = signal.sosfilt(signal.butter(6, 40, "high", fs=SR, output="sos"), heard)
    return signal.sosfilt(signal.ellip(12, .2, 80, 15800, fs=SR, output="sos"), heard)


dry = scene()
out = record(dry)
generate_wav(out)
```